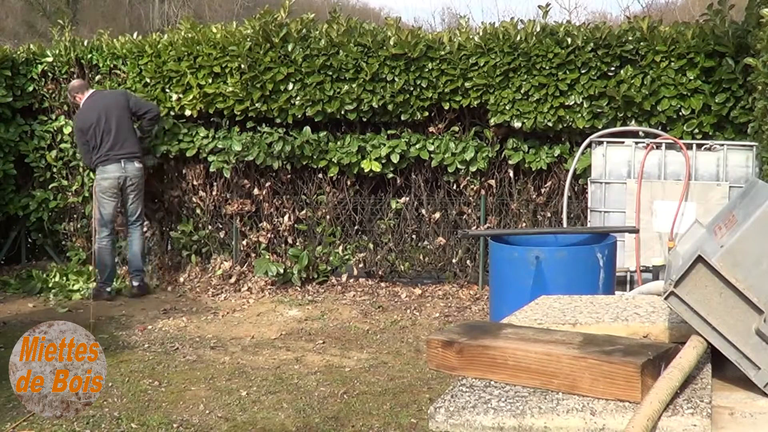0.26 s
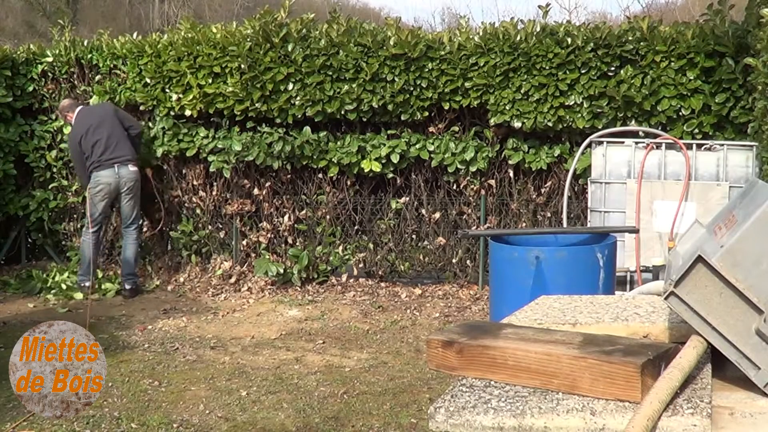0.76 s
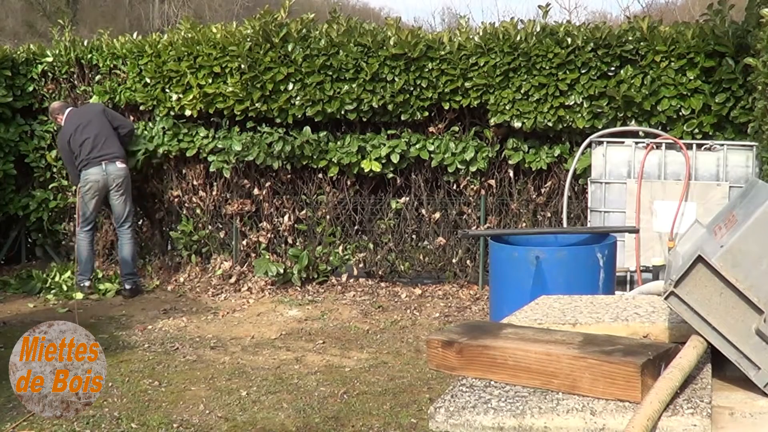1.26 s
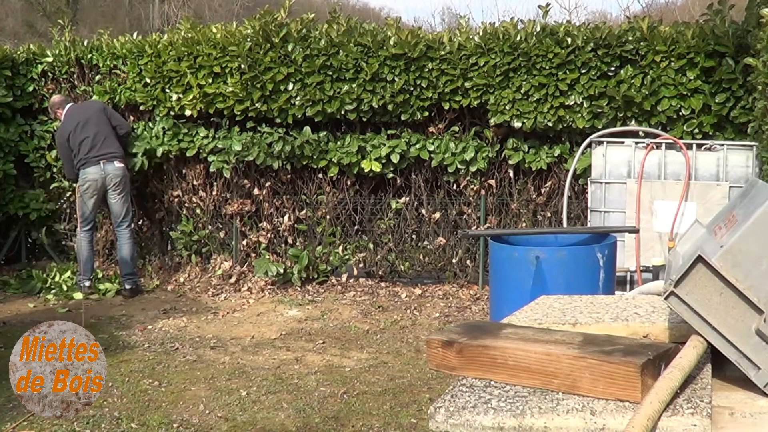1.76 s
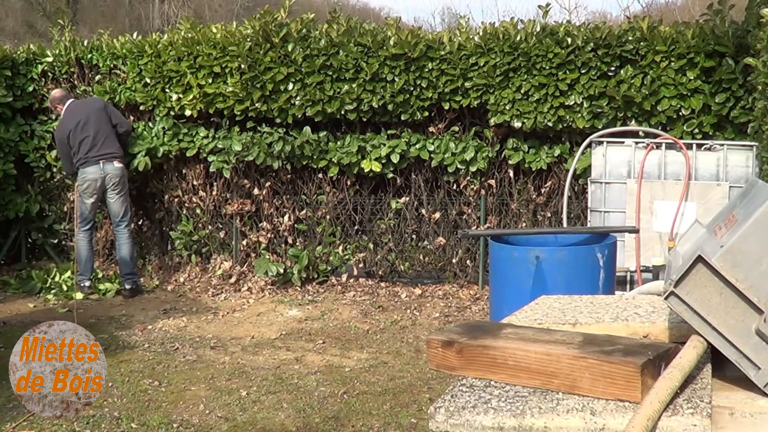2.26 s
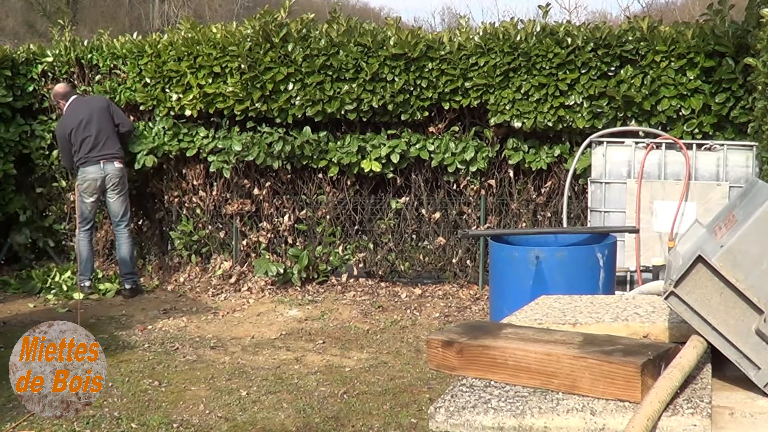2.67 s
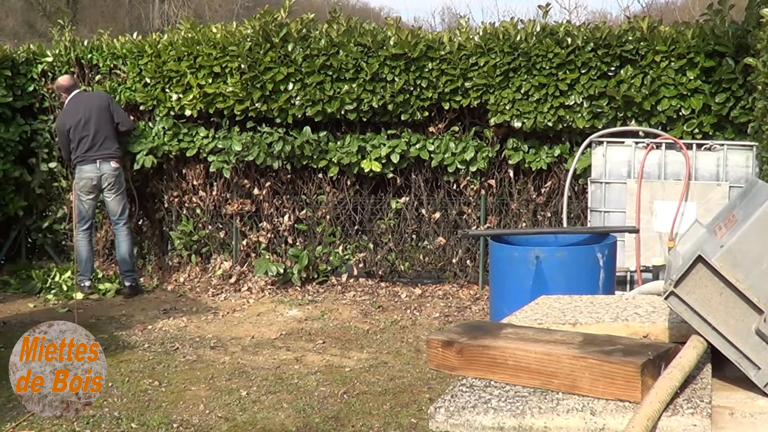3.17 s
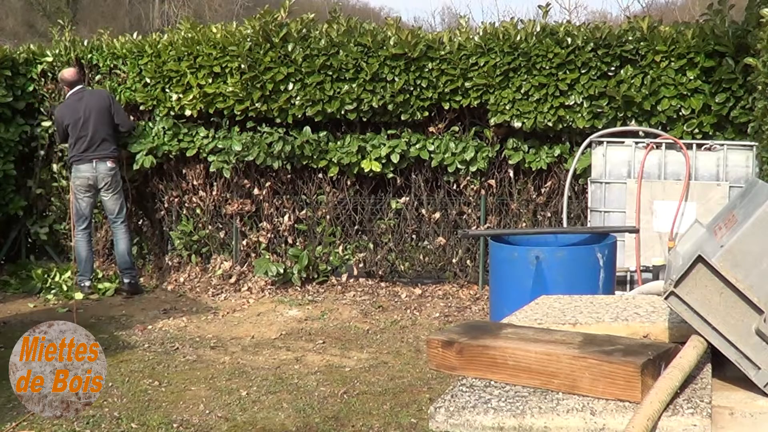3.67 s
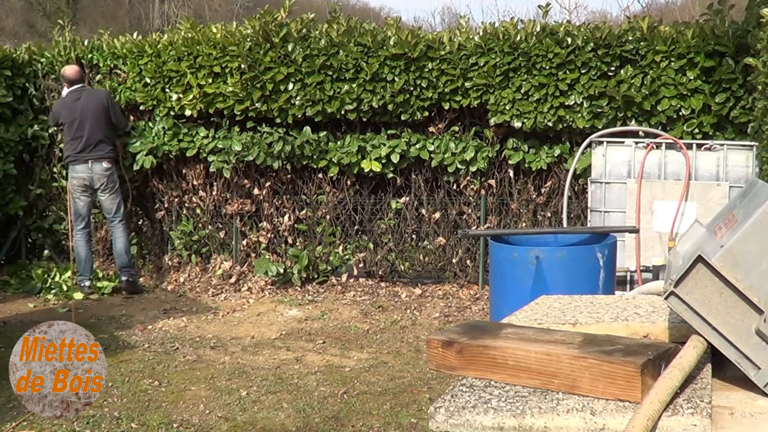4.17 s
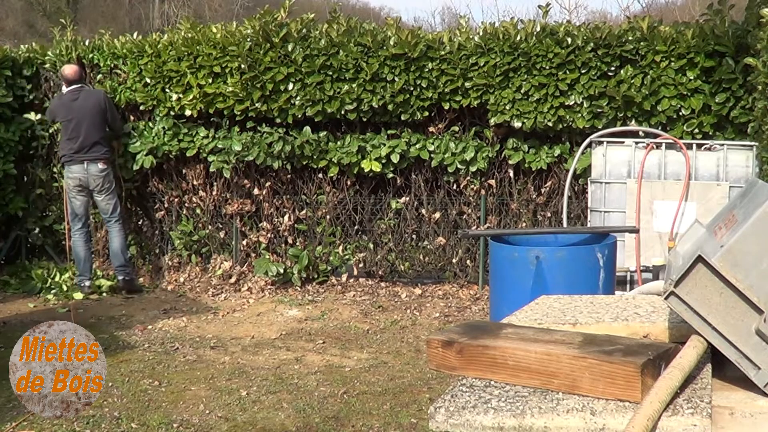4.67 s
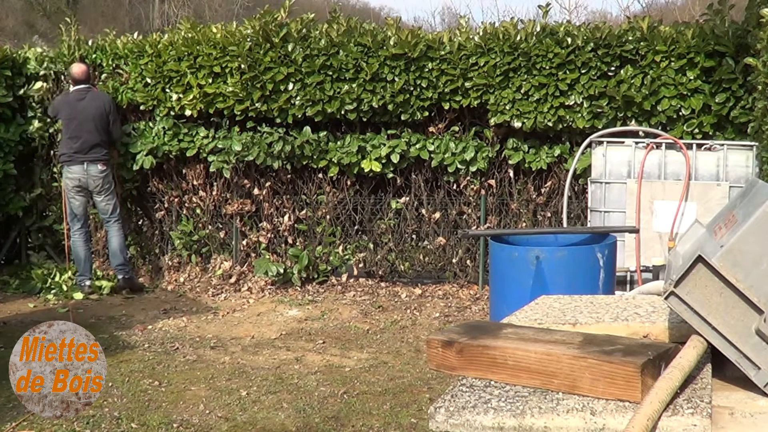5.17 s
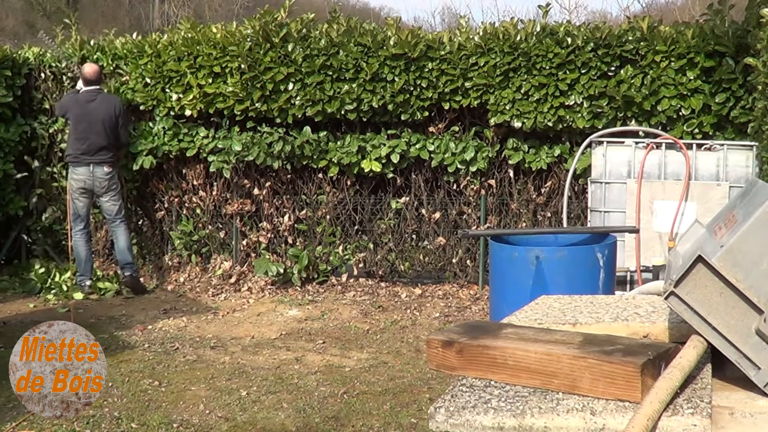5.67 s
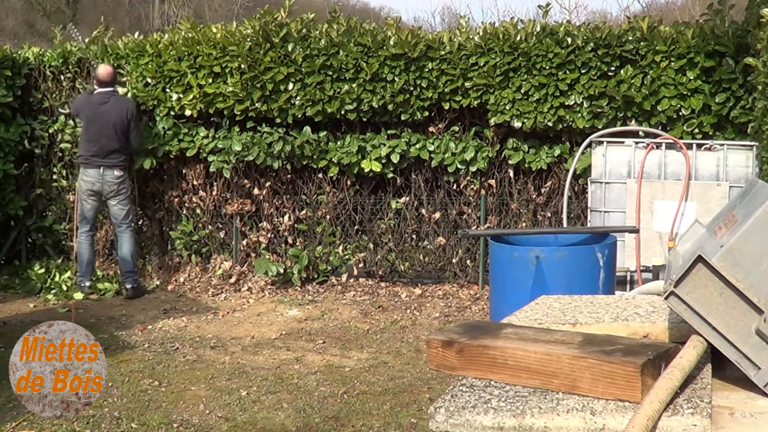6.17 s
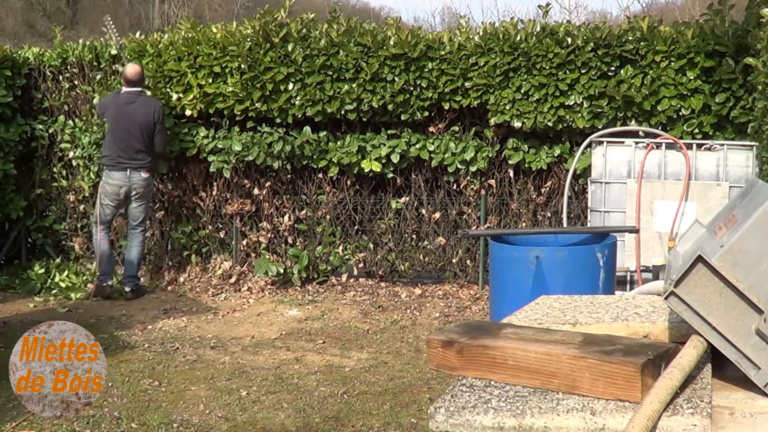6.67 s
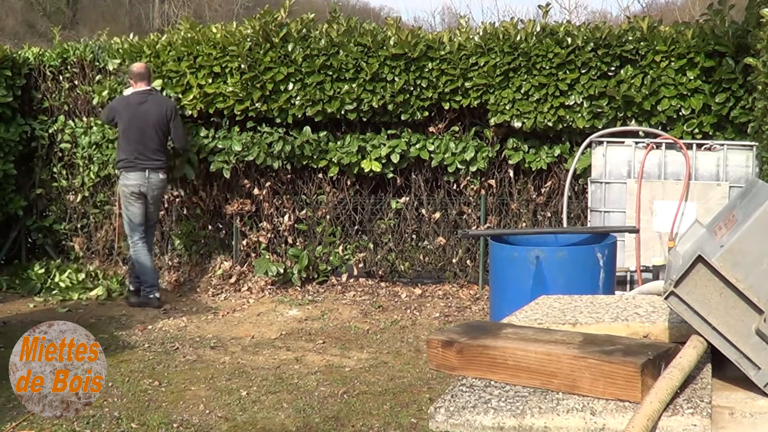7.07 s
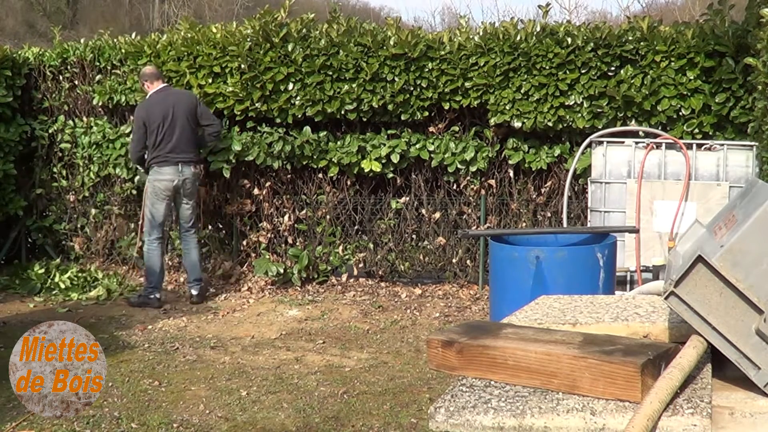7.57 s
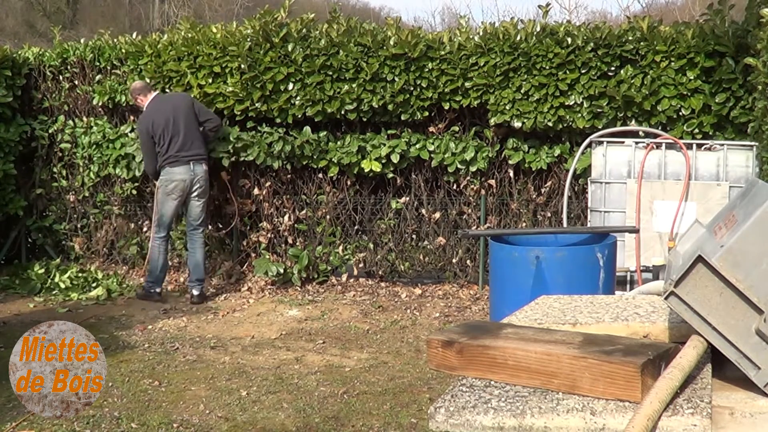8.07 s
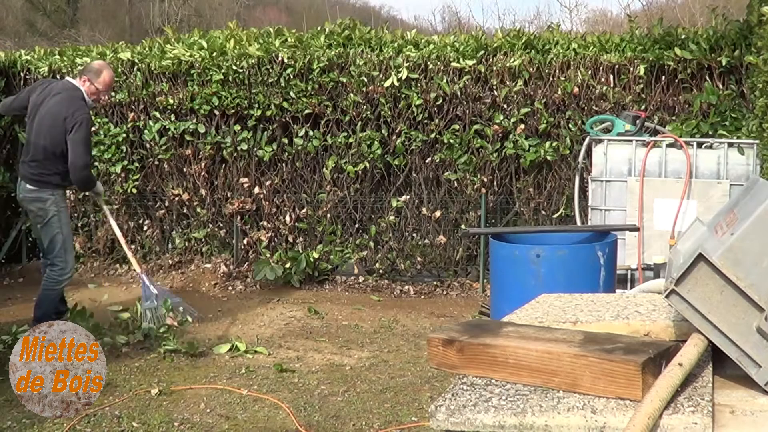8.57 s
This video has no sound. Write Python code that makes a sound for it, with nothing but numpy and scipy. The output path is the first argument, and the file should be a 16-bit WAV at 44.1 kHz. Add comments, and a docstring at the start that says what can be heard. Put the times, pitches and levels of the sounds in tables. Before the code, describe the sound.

In a garden, an electric hedge trimmer starts, cuts with snapping twigs and coasts to a stop, followed by a brief rake scrape.

```python
"""In a garden, an electric hedge trimmer starts several metres to the left, works up a hedge and coasts
to a stop. Friction and impact excite its steel blades, whose clatter also reflects off the ground;
its meshing gears whine through the resonances of their case. Twigs snap, leaves rustle and gusts
buffet the microphone. Then a fan rake scrapes cuttings over dry earth, its tines catching and
springing free. A far machine drones under the hush of the open air."""
import sys
import numpy as np
from scipy import signal
from scipy.fft import rfft, irfft
from scipy.io import wavfile

SR = 44100
rng = np.random.default_rng(int(sys.argv[2]) if len(sys.argv) > 2 else 0)


def pcm_store(signal):
    """Save signal as 16-bit PCM."""
    levels = np.round(np.clip(np.atleast_2d(signal), -1, 1) * 32767)
    wavfile.write(sys.argv[1], SR, levels.astype(np.int16).T)


N = 389403
T = np.arange(N) / SR
HZ = np.maximum(np.fft.rfftfreq(N, 1 / SR), 1)

# Spectrum of the air before and during the raking. Each row: frequency in Hz, relative level in dB.
TRIM_AIR = [(15, -37), (25, 3.5), (103, -2), (163, -4), (264, 1), (354, -2.5), (879, -2.5), (1210, -4),
            (1760, -7.5), (3010, -15.5), (9270, -19), (12100, -28), (15000, -21)]
RAKE_AIR = [(15, -55), (25, -29), (115, -18), (176, -14.5), (278, -9), (344, -12), (438, -16), (673, -11),
            (903, -15), (1280, -11), (2780, -21), (9770, -30), (15000, -39)]
# Partials of the far machine before and during the raking. Each row: frequency in Hz, level in dB.
TRIM_DRONE = [(100, -59.5), (132, -58), (264, -51), (398, -56.5), (878, -62)]
RAKE_DRONE = [(100, -55), (132, -53.5), (274.5, -43.5), (301.5, -49), (1260, -57), (1502, -51), (1911, -52)]
# Gusts on the microphone. Each row: start in seconds, hold in seconds, level in dB.
GUSTS = [(7.24, .08, -50), (7.56, .25, -45.5), (7.85, .04, -38.5), (8.05, .75, -56)]
# Sound from the left at the two capsules. Each row: frequency in Hz, left minus right in dB,
# phase lead of the left in radians.
CAPSULES = [(60, -11, 0), (260, 2, 1), (650, 2.5, 0.7), (1300, 3, 0.69), (2400, 3, 0.47), (6500, 2.5, 0.52),
            (9500, 2, 0.43), (12000, 4.5, 0.39)]
# Branches springing back with a rustle. Each row: start in seconds, level in dB.
RUSTLES = [(0, -42), (.13, -48.5), (7.48, -35), (7.66, -53), (7.77, -55), (8.08, -51)]
# Twigs snapped, sheared or brushed. Each row: start in seconds, level in dB, decay in seconds,
# centre in Hz.
TWIGS = [(.302, -22, 0.0015, 11200), (.303, -34, .02, 9500), (.382, -35, .008, 9500),
         (1.047, -22, .006, 7000), (2.74, -26, 0.0065, 7000), (2.805, -20.5, .015, 1980),
         (2.964, -23, .008, 8500), (3.034, -17, 0.013, 4204), (3.152, -16, 0.0078, 9000),
         (3.222, -19, .008, 8000), (4.561, -22, 0.0075, 6000), (5.676, -17.5, 0.0098, 3220),
         (5.891, -28, 0.0067, 6000), (6.336, -17, .008, 4000), (7.532, -29, 0.0058, 11000),
         (7.566, -32, .006, 7950), (7.776, -34.5, .018, 8100), (7.802, -36, .012, 9000),
         (7.903, -42, .008, 8000), (7.925, -39, .01, 8500), (7.972, -39, .008, 6000),
         (8.075, -43, .01, 8000)]
# Spectrum of scraped earth. Each row: frequency in Hz, relative level in dB.
EARTH_SPECTRUM = [(150, -27), (300, -3), (600, -6), (850, -5), (1500, -6), (2100, -6), (3200, -4),
                  (5000, 0.5), (8700, 1.5), (10500, 3), (12000, -8), (15000, -9)]
# A hard pull of the rake, then a light reach. Each row: start, attack and hold in seconds,
# relative level in dB.
RAKE_STROKES = [(8.157, 0.016, .12, -26), (8.58, 0.095, .08, -44)]
# Tines springing free. Each row: start in seconds, level in dB, decay in seconds, centre and width in Hz.
TINES = [(8.174, -20, .008, 8800, 5000), (8.252, -20, .006, 9400, 6000), (8.324, -18, 0.0085, 9500, 4500),
         (8.365, -18.5, .007, 6500, 1400), (8.364, -18, .006, 10000, 7000)]
# Gear mesh rate, sagging as the blades bite. Each row: time in seconds, rate at full speed in Hz.
POWERED_MESH = [(1.3, 1650), (2.15, 1665), (2.55, 1495), (2.75, 1535), (3.15, 1520), (3.45, 1620),
                (3.75, 1655), (4.1, 1590), (4.3, 1475), (4.75, 1455), (5.02, 1365), (5.3, 1624),
                (5.52, 1625), (5.67, 1440), (5.95, 1545), (6.4, 1511), (6.72, 1620), (6.96, 1560)]
# Radiation of the gear case. Each row: frequency in Hz, gain in dB.
CASE_SPECTRUM = [(200, -32), (450, -13), (650, 1.5), (810, 4), (920, 5), (1130, 3.5), (1350, 2.5),
                 (1550, -0.5), (1900, -6), (2400, -12), (2850, -6), (3400, 6.5), (4200, 2), (6500, -22)]
# Modes of the gear case. Each row: centre in Hz, width in Hz, strength in dB.
CASE_MODES = [(624, 97, 1), (815, 35, 3), (1020, 78, -5), (1190, 60, 8), (1360, 45, 4), (1458, 37, 8.5),
              (1536, 35, 7), (1650, 56, 6.5), (2450, 590, 14)]
# Heavy load on the teeth, at run-up and in thick growth. Each row: start in seconds, hold in seconds,
# rise of the whine in dB.
PULLS = [(0.483, 0.028, 16), (1.263, 0.78, 6.5), (2.528, 0.62, 5.5), (4.28, 0.48, 7), (5.3, 0.36, 7),
         (6.598, .25, 9.5)]
# Spectrum of the blades. Each row: frequency in Hz, relative level in dB.
STEEL_SPECTRUM = [(100, -48), (250, -9), (450, -6.5), (750, -1.5), (1100, -0.5), (1900, -2.5), (4400, -2.5),
                  (5900, -1), (7000, 1.5), (8600, 3), (9800, 4.5), (10800, 1.5), (12000, -4.5),
                  (15000, -11)]
# Modes of the housing. Each row: centre in Hz, width in Hz, strength in dB.
HOUSING_MODES = [(825, 30, -4), (1607, 180, -5), (3120, 270, -10.5), (3870, 83, 1.5), (4820, 640, -11)]
# The blades at full speed. Each row: time in seconds, relative levels of hiss and clatter in dB.
BLADE_LEVELS = [(.9, -19, -27), (2.4, -20, -27.5), (2.65, -21, -28), (3.6, -20.5, -27), (4.3, -20.5, -26.5),
                (5.2, -22, -27), (5.5, -20.5, -26), (6.96, -20.5, -25)]
# Two broad resonances, changing as the tool is turned and pressed in. Each row: time in seconds,
# full-speed levels of housing and blade bar in dB.
RING_LEVELS = [(.6, -35, -34), (1.2, -33.5, -34.5), (2.6, -44, -43), (3.4, -48, -35.5), (4.7, -37.5, -43),
               (5.7, -37.5, -35), (6.5, -50, -37)]
# Ground reflection, later as the tool is lifted. Each row: time in seconds, delay in milliseconds.
GROUND_DELAY = [(.5, 1.22), (1.1, 0.77), (1.5, 1.06), (2.4, 1.04), (3.6, 1.41), (4, 1.82)]

ON_S, OFF_S, RAKE_S = .428, 6.96, 8.163  # the switch closes, the switch opens, the raking begins


def undb(db):
    """Amplitude ratio of a level in decibels."""
    return 10 ** (np.asarray(db) / 20)


def unit(x):
    """Normalisation to an rms of 1."""
    return x / np.sqrt(np.mean(x ** 2))


def curve(rows):
    """Linear interpolation of a time table's columns at every sample."""
    s, *columns = np.transpose(rows)
    return [np.interp(T, s, c) for c in columns]


def over_hz(rows):
    """Interpolation of a frequency table's columns at every bin, on a logarithmic axis."""
    hz, *columns = np.transpose(rows)
    return [np.interp(np.log(HZ), np.log(hz), c) for c in columns]


def shape(x, gain):
    """Filtering by multiplication of the spectrum."""
    return irfft(rfft(x) * gain, N)


def resonance(hz, width):
    """Response of a damped oscillator, 1 at its centre."""
    return 1 / (1 + 1j * (HZ ** 2 - hz ** 2) / (HZ * width))


def radiation(spectrum, modes):
    """Modal superposition: each mode raises a peak on a body's broad spectrum."""
    peaks = sum(undb(db) * abs(resonance(hz, width)) ** 2 for hz, width, db in modes)
    return undb(over_hz(spectrum)[0]) * (1 + peaks)


def lowpass(hz):
    """Magnitude response of a second-order low-pass."""
    return 1 / np.sqrt(1 + (HZ / hz) ** 4)


def noise():
    """Gaussian white noise."""
    return rng.standard_normal(N)


def walk(hz):
    """Random fluctuation of rms 1, mostly slower than the given frequency."""
    return unit(shape(noise(), lowpass(hz)))


def after(s):
    """A step from 0 to 1 with a short ramp."""
    return np.clip((T - s) / 0.0016, 0, 1)


def swell(start, attack, hold, release):
    """An envelope of linear rise, hold and exponential decay."""
    decaying = np.maximum(T - start - attack - hold, 0)
    return np.clip((T - start) / attack, 0, 1) * np.exp(-decaying / release)


def grains(rate, spread_db):
    """Shot noise: tiny impacts of unequal size at random times."""
    sizes = undb(spread_db * np.minimum(rng.exponential(size=N), np.pi))
    return unit((rng.random(N) < rate / SR) * sizes * np.sign(noise()))


def burst(s, db, decay, hz, width):
    """A crack decays exponentially in one broad resonance, its highest treble softened."""
    age = T[:SR // 4]
    ring = signal.iirpeak(min(hz, .4 * SR), hz / min(width, .3 * SR), fs=SR)
    crack = signal.lfilter(*ring, signal.lfilter(*ring, rng.standard_normal(len(age))))
    softened = unit(signal.lfilter(*signal.butter(2, 12000, fs=SR), crack))
    return np.pad(softened * np.exp(-age / decay) * undb(db), (int(s * SR), N))[:N]


def air(spectrum, db, spread=0.36):
    """Diffuse noise is most alike at the two capsules in the bass, where wavelengths are long."""
    gain = undb(over_hz(spectrum)[0]) * (1 - lowpass(29))
    mid, side = (unit(shape(noise(), gain)) for _ in range(2))
    side = shape(side, spread * (0.1 + 1.5 * HZ / (HZ + 450)))
    return (mid + side * np.array([[1], [-1]])) * undb(db + 1.6 * walk(0.99))


def far_machine(partials):
    """A drone of sinusoids, each wavering by random modulation of frequency and amplitude."""
    hum = 0
    for hz, db in partials:
        phase = 2 * np.pi * np.cumsum(hz * (1 + 0.00399 * walk(7.9))) / SR
        hum = hum + np.sqrt(2) * undb(db + 0.5 * walk(12)) * np.sin(phase)
    return hum


def ebb(x, boost_db=5.5, fall_db_per_s=1.05):
    """The midrange of the background starts raised and dies down by slow exponential decay."""
    band = shape(x, abs(resonance(1060, width=1100)) ** 2)
    return x + band * (undb(boost_db - fall_db_per_s * T) - 1)


def gusts():
    """Turbulent pressure of wind on the microphone makes a low rumble."""
    wind = sum(undb(db) * swell(s, .05, hold, release=0.034) for s, hold, db in GUSTS)
    return unit(shape(noise(), resonance(64, width=60) * lowpass(139.5))) * wind


def garden(x, scatter_db=-7, decay_s=0.034):
    """Level and phase differences place sound on the left; hedge, tanks and timber scatter an echo."""
    balance_db, lead = over_hz(CAPSULES)
    log_ratio = np.log(undb(balance_db)) + 1j * lead
    direct = shape(x, np.exp(np.array([[1], [-1]]) * log_ratio / 2))
    tails = rng.standard_normal((2, N)) * np.exp(-T / decay_s) * after(0.0033)
    tails /= np.sqrt(np.sum(tails ** 2, axis=1, keepdims=True))
    drift_s = .0004 * walk(.7)  # the echo's path changes as the gardener moves
    moving = np.interp(T - drift_s, T, x)
    return direct + undb(scatter_db) * shape(moving, rfft(tails) * lowpass(12000))


def foliage():
    """Many small leaf impacts sum to a rustle; twigs fracture in single cracks."""
    leaf_band = resonance(11000, width=9000) * lowpass(8500) ** 2
    rustle = unit(shape(grains(rate=3000, spread_db=3.0), leaf_band))
    shaking = sum(undb(db) * swell(s, attack=0.011, hold=0.033, release=0.13) for s, db in RUSTLES)
    twigs = sum(burst(s, db, decay, hz, width=0.9 * hz) for s, db, decay, hz in TWIGS)
    return rustle * shaking * (1 - after(RAKE_S)) + twigs


def rake(scrape_db=3.0, judder_db=1.4):
    """Stick-slip friction: tines drag over grit and cuttings, and some catch and spring free."""
    grit = grains(rate=6800, spread_db=-1.5) + .5 * noise()
    pull = sum(undb(db) * swell(s, attack, hold, release=0.12) for s, attack, hold, db in RAKE_STROKES)
    scrape = unit(shape(grit, undb(over_hz(EARTH_SPECTRUM)[0])))
    scrape = scrape * pull * undb(scrape_db + judder_db * walk(50))
    return scrape * after(RAKE_S) + sum(burst(*row) for row in TINES)


def motor(spin_up_s=.195, slack_s=.06, coast_s=1.013):
    """Speed rises exponentially under power; once off, it drops a little and friction slows it evenly."""
    running, coasting = np.maximum(T - ON_S, 0), np.maximum(T - OFF_S, 0)
    slack = 1 - np.exp(-coasting / slack_s)  # 0 while driven, 1 when running free
    speed = 1 - .64 * np.exp(-running / spin_up_s) - .053 * slack - coasting / coast_s
    return np.clip(speed, 1e-6, 1), slack  # speed is a share of full speed


def gears(mesh_hz, speed, slack, crank, whine_db=-48, coast_boost_db=13.5, flutter_db=2.5):
    """Periodic tooth contact makes a whine whose harmonics flare as they cross the modes of the case."""
    jitter = np.where(T < OFF_S, 0.01213, 0.0092)
    hz = mesh_hz * (1 + jitter * walk(100))
    phase = 2 * np.pi * np.cumsum(hz) / SR
    case = radiation(CASE_SPECTRUM, CASE_MODES)
    tone = 0
    for k, db in enumerate([0, -5.5, -9, -14], 1):
        tone = tone + np.sin(k * phase) * np.interp(k * hz, HZ, case) * undb(db + flutter_db * walk(39))
    throb = .3 * np.cos(crank) + .35 * np.cos(2 * crank) + .2 * np.cos(4 * crank)
    load = 1 - .6 * slack
    pull_db = sum(db * swell(s, 0.022, hold, release=0.03) for s, hold, db in PULLS)
    return tone * (1 + load * throb) * undb(whine_db + coast_boost_db * slack + pull_db) * speed ** 0.67


def tool_vibration(mesh_hz, speed, slack, strokes, shaft_db=-50, coast_db=-18):
    """Forced vibration: housing and blade bar ring in broad bands above the tone of the shaft."""
    housing_db, bar_db = curve(RING_LEVELS)
    rings = 0
    for hz, width, db in [(1100, 285, housing_db), (2366, 510, bar_db)]:
        band = unit(shape(noise() * strokes, resonance(hz, width) ** 2))
        rings = rings + band * undb(db + 2.5 * walk(25.6))
    shaft = np.sin(2 * np.pi * np.cumsum(mesh_hz / 4) / SR)
    return (rings + shaft * undb(shaft_db)) * speed ** 1.58 * undb(coast_db * slack)


def ground_reflection(x, strength=0.32):
    """A delayed reflection interferes with the direct sound; soft earth absorbs its treble."""
    delay_s = curve(GROUND_DELAY)[0] / 1000
    return strength * np.interp(T - delay_s, T, shape(x, lowpass(1270)))


def steel_modes(contacts, count=18, width_hz=70):
    """Narrow resonances of the blades; each comes and goes as twigs touch and damp the steel."""
    knots = np.arange(0, T[-1] + 1, 0.1)
    ringing = 0
    for hz in np.geomspace(1800, 6500, count) * rng.uniform(.96, 1.04, count):
        mode = signal.lfilter(*signal.iirpeak(hz, hz / width_hz, fs=SR), contacts)
        levels_db = rng.uniform(-14.5, 16, len(knots))
        ringing = ringing + mode * np.interp(T, knots, undb(levels_db))
    return unit(ringing)


def blades(speed, slack, strokes, jolt_db=-34, rattle_db=1.44, coast_db=-6):
    """Friction and impact of steel on steel give hiss and clatter, each growing as a power of speed."""
    hiss_db, clatter_db = curve(BLADE_LEVELS)
    jolt = undb(jolt_db) * swell(ON_S, attack=.002, hold=0, release=.06)  # the blades jerk loose
    contacts = (grains(rate=9000, spread_db=2.5) + 0.77 * noise()) * strokes
    body = radiation(STEEL_SPECTRUM, HOUSING_MODES)
    low = lowpass(4750) ** 2
    hiss = unit(shape(contacts, body * (1 - low)))
    dull = np.clip(2.2 * slack * (1 - speed), 0, 1)  # coasting blades strike more softly
    hiss = (1 - dull) * hiss + dull * unit(shape(hiss, lowpass(11000) ** 2))
    hiss = hiss * np.hypot(undb(hiss_db - 0.47) * speed ** 3.17, jolt)
    clatter = .92 * unit(shape(contacts, body * low)) + .42 * steel_modes(contacts)
    clatter_gain = undb(clatter_db + coast_db * slack + rattle_db * walk(41)) * speed ** 1.57
    clatter = clatter * np.hypot(clatter_gain, jolt)
    return hiss + clatter + ground_reflection(clatter)


def trimmer(beat_depth=0.037, snag_db=0.72, stall_speed=0.19):
    """One motor drives blades and gears; crank strokes and snagging twigs modulate the amplitude."""
    speed, slack = motor()
    mesh_hz = curve(POWERED_MESH)[0] * speed
    crank = 2 * np.pi * np.cumsum(mesh_hz / 72) / SR  # one turn per 72 tooth contacts
    beat = np.cos(4 * crank) + 0.85 * np.cos(2 * crank) + 0.25 * np.cos(crank)
    strokes = (1 + beat_depth * beat) * undb(snag_db * walk(24))
    turning = after(ON_S) * np.minimum(speed / stall_speed, 1) ** 2
    chatter = blades(speed, slack, strokes) + tool_vibration(mesh_hz, speed, slack, strokes)
    return (chatter + gears(mesh_hz, speed, slack, crank)) * turning


def scene():
    """Superposition of the sources; the trimming and its background give way at once to the raking."""
    raking = after(RAKE_S)
    behind_trimmer = ebb(air(TRIM_AIR, db=-39.5) + far_machine(TRIM_DRONE))
    behind_rake = air(RAKE_AIR, db=-36) + far_machine(RAKE_DRONE)
    background = (1 - raking) * behind_trimmer + raking * behind_rake
    return garden(trimmer() + foliage() + rake()) + background + gusts()


def record(dry):
    """Mid-side filtering narrows the high treble to the centre; a steep low-pass cuts the top."""
    mid = dry.mean(axis=0)
    narrowed = mid + shape(dry - mid, np.clip((12500 - HZ) / 2500, 0, 1))
    return signal.sosfilt(signal.ellip(10, .2, 80, 15700, fs=SR, output="sos"), narrowed)


dry = scene()
out = record(dry)
pcm_store(out)
```